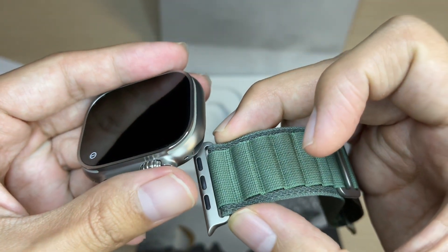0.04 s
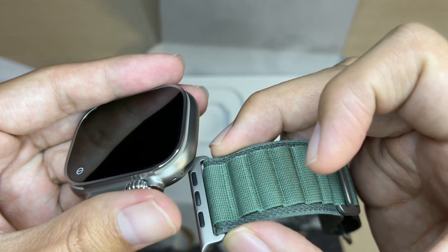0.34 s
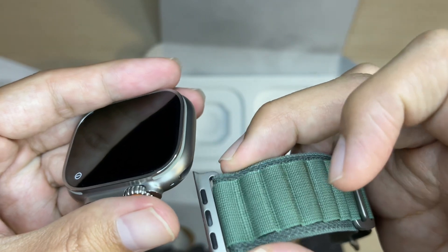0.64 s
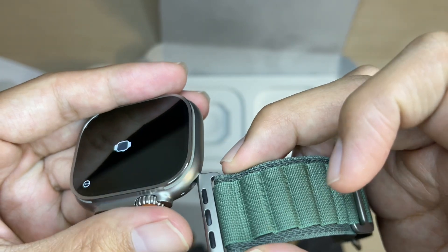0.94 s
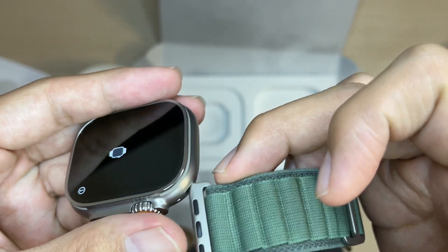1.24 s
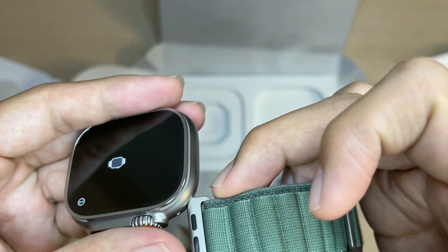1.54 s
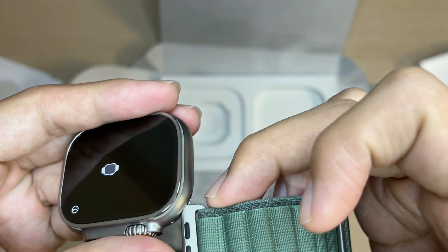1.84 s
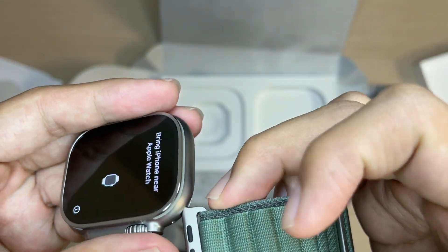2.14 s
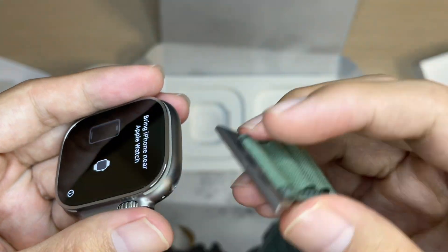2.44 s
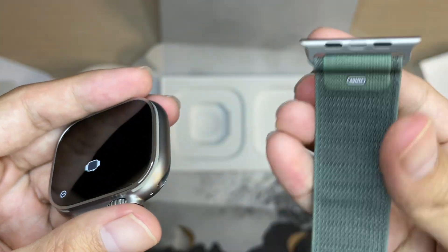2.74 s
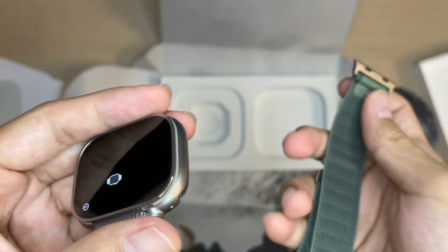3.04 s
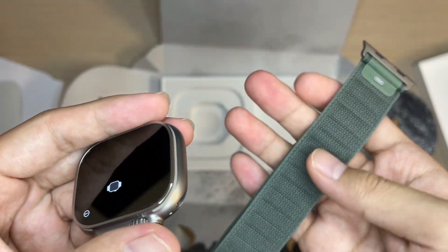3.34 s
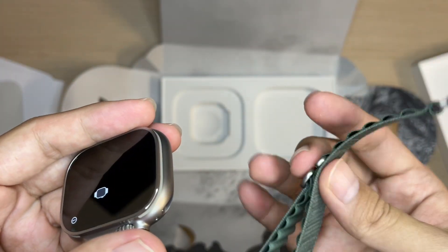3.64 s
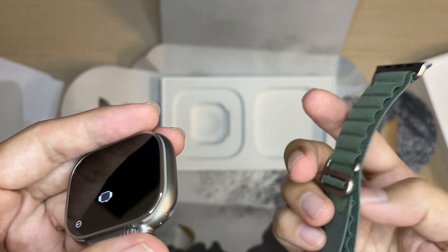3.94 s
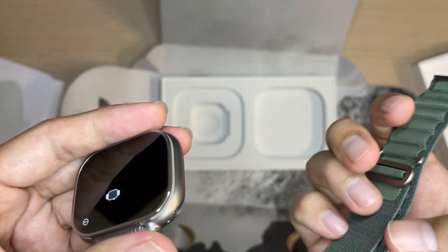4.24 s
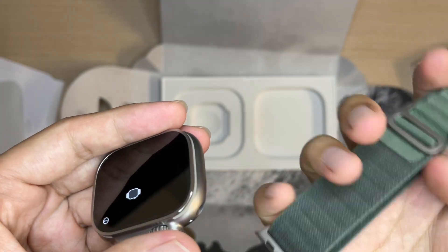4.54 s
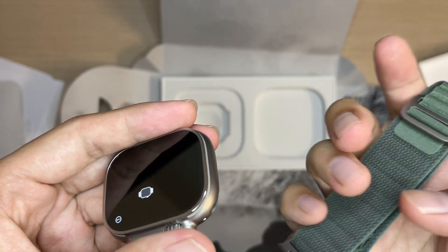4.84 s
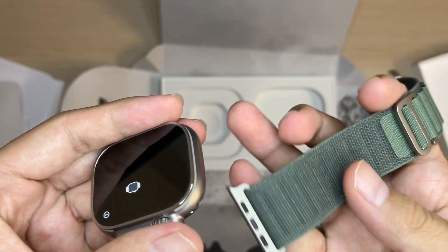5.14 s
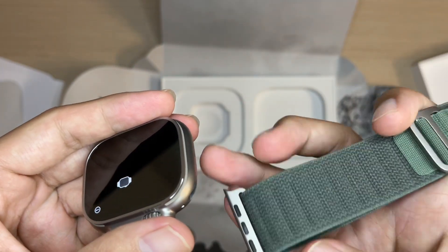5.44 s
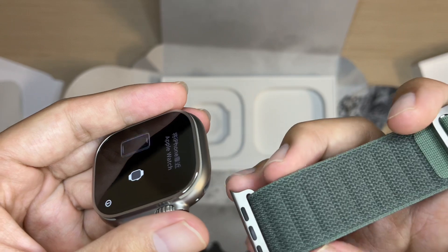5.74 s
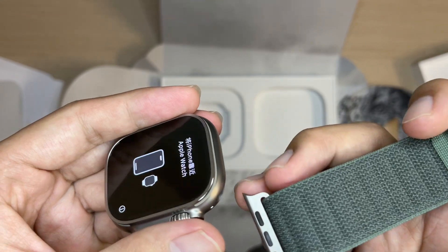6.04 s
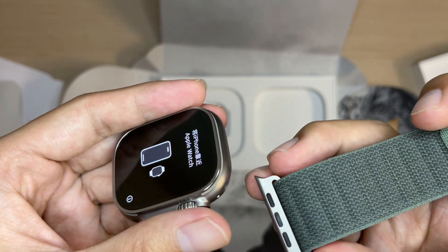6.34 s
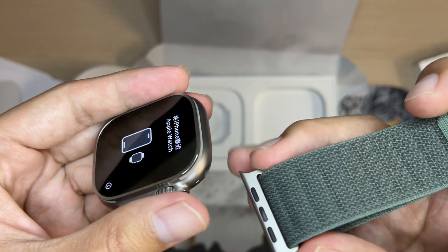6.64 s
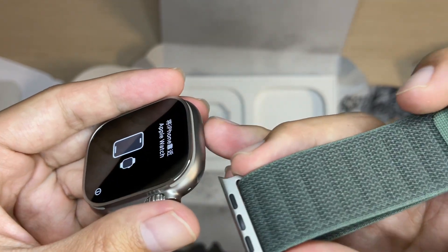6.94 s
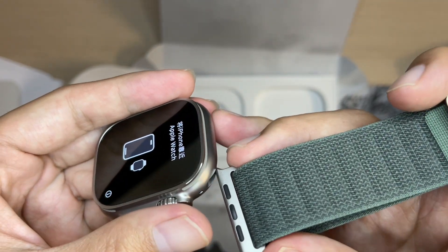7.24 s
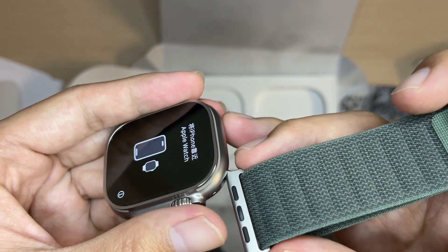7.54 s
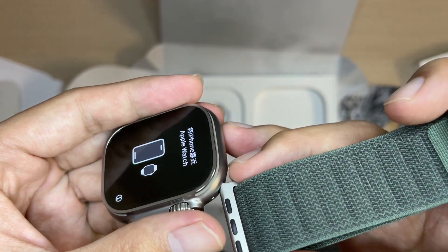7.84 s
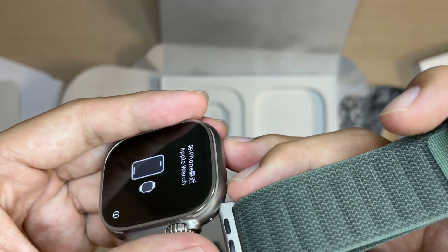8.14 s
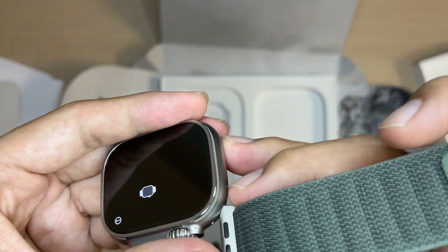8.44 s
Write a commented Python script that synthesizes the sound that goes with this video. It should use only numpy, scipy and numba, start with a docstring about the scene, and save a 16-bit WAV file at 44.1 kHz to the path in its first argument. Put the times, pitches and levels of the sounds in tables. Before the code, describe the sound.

A metal watch and its woven band are handled close to the microphone in a small room. First come a few light ticks and brief, squeaky scrapes from the band's metal end. Then fingers slide over the weave in a run of scratchy, hissing strokes, mixed with buckle clicks. After a lull, a few more ticks and a sharp little scrape follow. Ventilation rumbles and hums steadily throughout.

```python
"""A metal watch on a woven band, turned over in the hands close to a phone's microphone in a small room.
Fingers slide over the weave and its threads catch and hiss; the band's metal end scrapes in stick-slip
and ticks, the buckle clicks. Table top and near walls add a short tail.
Ventilation rumbles and hums steadily behind; two microphone ports hear it all a little apart."""
import sys
import numpy as np
from scipy import signal
from scipy.fft import rfft, irfft
from scipy.io import wavfile
from numba import njit

SR = 44100
rng = np.random.default_rng(int(sys.argv[2]) if len(sys.argv) > 2 else 0)


def to_wav(sig):
    """Store sig (one row per channel, or 1-D mono) as 16-bit WAV at the path in sys.argv[1].

    Samples outside -1..1 are clipped; the rate is SR.
    """
    pcm = np.clip(np.atleast_2d(sig), -1, 1) * 32767
    pcm = np.round(pcm).astype(np.int16)
    wavfile.write(sys.argv[1], SR, pcm.T)  # frames by channels


N = 378378
T = np.arange(N) / SR
FREQS = np.maximum(np.fft.rfftfreq(N, 1 / SR), 1)
# spectrum of skin on the weave, close up [f/Hz, level/dB]
WEAVE_SPECTRUM = [(2500, -24.5), (4000, -6.5), (5000, -7), (5800, -1.5), (7000, -1.5), (8500, 2),
                  (9600, -2), (10300, 6), (11100, 2.5), (11600, -7.5), (12300, -22), (13000, -45)]


def webbing(grip_s=0.024, release_s=0.041, ahead_db=-14, ahead_hz=4700):
    """Threads catch on skin and hiss over a duller rub. Gives sound at the hands and from straight ahead."""
    # the band slides through the fingers [start/s, length/s, relative level/dB, rub share/dB]
    slides = [(0, 0.31, -83.5, 3.5), (0.293, 0.25, -85, 5), (2.308, .2, -88.5, 10.5),
              (2.496, .3, -82.5, 7.5), (4.6, .07, -77, 1), (2.869, 0.098, -61, -3.5),
              (2.983, 1.2, -72.5, -2.5), (3.453, .17, -75.5, -1), (3.705, 0.077, -58.5, -18),
              (4.254, 0.362, -59.5, -7.5), (4.662, 0.38, -60, -8.5), (5.032, 0.29, -61, -9.5),
              (5.319, 0.15, -69, -14), (7.895, 0.083, -70.5, -8), (7.1, 1.27, -92.5, 8.5)]
    # a fingertip brushes the weave once [crest/s, length/s, level/dB, rub share/dB]
    brushes = [(0.022, 0.11, -73, -8), (2.516, 0.066, -72, 1), (2.624, 0.089, -61, -5),
               (2.738, 0.037, -59, 3.5), (2.837, 0.11, -57, -2.5), (3.053, 0.054, -70, -10),
               (3.306, 0.13, -60.5, -8), (3.457, 0.069, -70, -6), (3.619, 0.076, -56.5, -7),
               (3.685, 0.018, -54.5, -10), (3.958, 0.1, -63.5, -12), (4.504, 0.11, -60, -9),
               (4.567, 0.098, -55.5, -3.5), (4.886, 0.26, -75, -2.5), (4.685, 0.027, -57, -8.5),
               (5.01, 0.048, -50.5, -8), (5.049, .02, -54, -8), (5.276, 0.099, -57, -21),
               (5.379, 0.08, -61, -9), (5.585, 0.15, -79, 4), (5.799, 0.091, -74.5, 4.5),
               (6.491, 0.042, -81.5, 7), (7.644, 0.051, -79.5, 11.5), (8.408, 0.083, -61, -6),
               (8.528, 0.027, -65, 4)]
    # spectrum of the pressed band's rub [f/Hz, level/dB]
    rub_spectrum = [(400, -15), (900, 1.5), (1700, -3.5), (2500, 2), (3800, -1), (5000, 1.5), (8000, -28)]
    pace = undb(-1 + 0.1 * walk(rate=18))  # the hand never pulls evenly
    moves = [(undb(db) * pace * drag(start, length + release_s / 2, grip_s, release_s), rub_db)
             for start, length, db, rub_db in slides]
    moves += [(undb(db) * touch(crest, length), rub_db) for crest, length, db, rub_db in brushes]
    hiss_speed = np.sqrt(sum(speed ** 2 for speed, _ in moves))
    rub_speed = np.sqrt(sum((speed * undb(rub_db)) ** 2 for speed, rub_db in moves))
    threads = catches(rate=6000, scatter_db=1.5) + undb(-5.5) * catches(rate=380, scatter_db=0)
    hiss = hiss_speed * unit(unit(colour(threads, WEAVE_SPECTRUM)) + undb(-5) * plucks())
    rub = rub_speed * unit(colour(catches(rate=4000, scatter_db=2), rub_spectrum))
    narrow_hiss = glide(catches(rate=2600, scatter_db=2.5), ahead_hz, width_hz=2600)
    ahead = undb(ahead_db) * hiss_speed * unit(narrow_hiss)
    scratch = shifting_contact(hiss + rub)
    return np.array([scratch, ahead]) * undb(1.5 * walk(rate=90))  # the ribs grip unevenly


def plucks(width_hz=330, count=14, snags_per_s=13):
    """Single threads snag and spring free, each ringing for a few milliseconds at its own pitch."""
    pitches_hz = np.linspace(3000, 11400, count)
    snags = rng.random((count, N)) < snags_per_s / SR
    rings = sum(resonate(1. * snag, hz, width_hz) for snag, hz in zip(snags, pitches_hz))
    return unit(colour(rings, WEAVE_SPECTRUM))


def shifting_contact(x, depth_db=2.6, count=7):
    """As the contact patch moves, each part of the treble swells and fades by itself."""
    spectrum, centres_hz = rfft(x), np.linspace(2000, 12000, count)
    bands = (irfft(spectrum * np.interp(FREQS, centres_hz, share), N) for share in np.eye(count))
    return sum(band * undb(depth_db * walk(rate=35)) for band in bands)


def swishes(width_hz=750, octaves_per_s=-0.91):
    """A quick skid sings high in the weave and sinks as the finger slows."""
    # skin skids over the ribs [crest/s, length/s, level/dB, f/Hz]
    skids = [(2.834, .06, -62, 11000), (3.31, .07, -67, 11000), (3.622, 0.035, -60, 11000),
             (3.738, 0.1, -64, 11000), (4.308, 0.11, -60, 10960), (4.512, 0.11, -50.5, 10900),
             (5.076, 0.091, -64, 11500), (5.254, .07, -75, 10900), (7.779, 0.034, -59.5, 10500),
             (8.412, 0.055, -65, 10400)]
    slips = catches(rate=5900, scatter_db=1)
    out = np.zeros(N)
    for crest, length, db, hz in skids:
        swish = glide(slips, hz, width_hz, crest, length, octaves_per_s * length)
        out += undb(db) * touch(crest, length) * unit(swish)
    return out


def grazes():
    """Light friction wakes one damped resonance at a time; some glide as the contact moves."""
    # a finger grazes buckle, lug or taut band [crest/s, length/s, level/dB, f/Hz, width/Hz, glide/octaves]
    contacts = [(1.262, .022, -51.5, 1010, 600, 0.084), (1.282, 0.033, -51, 3000, 1000, -.55),
                (2.22, 0.045, -44, 1540, 750, -.75), (2.517, .038, -71, 2590, 760, 0),
                (2.625, 0.079, -67, 2400, 760, 0), (2.86, 0.084, -61.5, 2850, 760, 0),
                (3.265, 0.98, -71.5, 1350, 900, 0), (3.26, .26, -61.5, 610, 700, 0),
                (3.947, 0.078, -68, 2800, 760, 0), (4.076, .037, -68.5, 2880, 760, 0),
                (4.485, 0.046, -66, 3400, 1200, 0), (4.61, 0.015, -63, 3400, 500, 0),
                (4.748, .026, -60.5, 3400, 900, -0.36), (4.861, .018, -63, 3800, 450, 0),
                (5.01, .016, -54, 3500, 1500, 0), (5.164, .027, -64.5, 3800, 500, 0),
                (5.26, 0.22, -66.5, 3940, 760, 0), (5.25, .3, -75, 860, 500, 0),
                (7.777, .024, -58.5, 3840, 700, 0), (7.917, 0.022, -64.5, 3100, 1100, 0),
                (8.551, 0.03, -49, 2100, 700, 0.22), (8.558, 0.065, -55, 2800, 760, 0)]
    slips = catches(rate=7000, scatter_db=-1)
    out = np.zeros(N)
    for crest, length, db, hz, width, octaves in contacts:
        speed = touch(crest, length)
        ring = glide(speed * slips, hz, width, crest, length, octaves)
        out += undb(db) * ring * np.linalg.norm(speed) / np.linalg.norm(ring)
    return out


def scrapes(squeak_q=11, judder_db=1.5, light_touch_db=-5):
    """The metal end sticks and slips: grit and squeak grow with pressure, a firm press rings its body."""
    # strokes of the metal end [start/s, length/s, hardest press/share of length, grit/dB, ring/dB,
    # squeak f/Hz, squeak relative level/dB, glide/octaves, overtone/dB]
    strokes = [(0.816, 0.031, 0.03, -60, -54, 3400, -57.5, -0.36, -7),
               (0.88, 0.071, 0.46, -84, -60.5, 3200, -65.5, -0.031, -21),
               (1.241, 0.054, 0.5, -63, -49.5, 6130, -54, -.3, -8),
               (2.161, 0.0765, 0.92, -48, -49.5, 5360, -48, -0.036, 13),
               (7.233, 0.043, 0.16, -78, -68, 2830, -61, 0.034, -10),
               (7.754, 0.047, 0.4, -54.5, -66, 5430, -61, 0.036, -4),
               (7.905, 0.017, 0.6, -61, -68, 3200, -70, 0, -14),
               (8.533, 0.029, 0.65, -46, -54.5, 6550, -50.5, 0.21, -14),
               (8.56, .012, 0.46, -50, -55, 6300, -53, 0, -14)]
    # spectrum of the grit [f/Hz, level/dB]
    grit_spectrum = [(1200, -8.5), (2500, -1.5), (4500, 1.5), (6200, 0.5), (7000, -13), (7900, 2),
                     (9700, -13), (10600, 0), (11400, 4), (12000, -20), (13000, -35)]
    slips = rasp() * catches(rate=11000, scatter_db=-0.5) * undb(judder_db * walk(rate=770))
    grit, ring = colour(slips, grit_spectrum), metal_body(slips)
    out = np.zeros(N)
    for start, length, hardest, grit_db, ring_db, hz, squeak_db, octaves, overtone_db in strokes:
        press = stroke(start, length, hardest)
        bite = drag(start, length, attack_s=0.0094, release_s=0.0016)
        friction = bite * undb(light_touch_db * (1.5 - press))
        width, middle = 2 * hz / squeak_q, start + length / 2
        squeak = glide(slips, hz, width, middle, length, octaves)
        squeak += undb(overtone_db) * glide(slips, 2 * hz, width, middle, length, octaves)
        layers = (grit, friction, grit_db), (ring, press ** 0.76, ring_db), (squeak, friction, squeak_db - 1)
        for sound, drive, db in layers:
            out += undb(db) * drive * sound * np.linalg.norm(drive) / np.linalg.norm(drive * sound)
    return out


def rasp(slip_hz=169.5, jitter=0.18, fade_cycles=0.47):
    """Uneven stick-slip cycle of the metal edge: each release starts sharply and fades to a floor."""
    phase = np.cumsum(slip_hz * (1 + jitter * walk(rate=110))) / SR % 1
    return unit(undb(2) + np.exp(-phase / fade_cycles))


def ticks(contact_s=0.00035, chatter_db=-15, chatter_s=0.0045, width_hz=2100, push_s=0.000089, size=2048):
    """A very short metal contact snaps brightly, chatters briefly and knocks the body."""
    # metal end and buckle strike [t/s, snap before colouring/dB, ring/dB, snap f/Hz, broad crack share/dB]
    strikes = [(.174, -42, -48.5, 10700, -10.5), (.2575, -54.5, -57.5, 10800, -12),
               (0.8186, -37, -47, 10900, -21.5), (0.942, -49, -58, 7900, 12), (.9522, -53, -68, 7940, -5),
               (1.2414, -70, -52, 6500, -12), (1.2527, -60, -42.5, 7000, -10),
               (1.2615, -53, -48, 6200, -18), (1.2697, -49, -60, 6050, -20), (1.2935, -40, -48, 12100, -5),
               (2.1604, -54, -54, 10700, -15), (2.6083, -55, -74, 11300, -20),
               (2.7365, -66, -66, 10500, -6), (2.805, -58, -66, 8500, -5), (3.294, -49, -74, 10800, -4),
               (3.536, -51, -78, 9500, -5), (3.683, -45, -69, 11900, -33), (4.3065, -50, -76, 12000, -21),
               (4.333, -55.5, -66, 6500, -5), (4.434, -59, -74, 7000, -10), (4.568, -55, -66, 6500, -6),
               (4.576, -50, -68, 6300, -6), (4.591, -53, -64, 4200, -6), (4.6755, -46.5, -61, 10500, -20),
               (4.718, -47, -77, 10600, -20), (5.0176, -36, -68, 8050, -13), (5.034, -68, -80, 6600, -20),
               (5.0495, -34, -74, 8670, -26), (5.274, -47.5, -75, 8460, 3), (5.4327, -55, -84, 9900, -18),
               (5.605, -62, -63, 7000, -5), (6.6659, -61.5, -82, 6800, -13), (6.796, -69.5, -84, 6960, -16),
               (7.49, -59.5, -62, 6270, -6), (7.53, -57, -61, 4340, 3)]
    # colouring of the snaps [f/Hz, gain/dB]
    snap_spectrum = [(1000, -22), (3000, -2.5), (5000, 7.5), (8000, -0.5), (11000, -0.5), (12200, -21),
                     (14000, -28)]
    t = np.arange(size) / SR
    snaps, knocks = np.zeros((2, N + size))
    span = np.sqrt(0.002 * SR)  # levels count as energy spread over 2 ms
    knock = metal_body(t * np.exp(-t / push_s))  # the fingers cushion the push
    force = np.exp(-t / contact_s) + undb(chatter_db) * np.exp(-t / chatter_s)
    for start, snap_db, ring_db, hz, crack_db in strikes:
        contact = rng.standard_normal(size) * force
        snap = resonate(resonate(contact, hz, width_hz), hz, width_hz) + undb(crack_db) * contact
        i = int(start * SR)
        snaps[i:i + size] += undb(snap_db) * span * snap / np.linalg.norm(snap)
        knocks[i:i + size] += undb(ring_db) * span * knock / np.linalg.norm(knock)
    return colour(snaps[:N], snap_spectrum) + knocks[:N]


def metal_body(x):
    """The metal end rings briefly, damped by the fingers."""
    # its resonances [f/Hz, width/Hz, level/dB]
    modes = [(952, 56, 3), (1260, 150, -9), (1620, 195, 11), (2220, 290, 6), (3050, 120, -22),
             (3660, 250, -10)]
    return sum(undb(db) * resonate(x, hz, width) for hz, width, db in modes)


def room(x, wet_db=-15, t60_s=0.26, gap_s=0.002, apart=0.07, size=16384):
    """Table top and near walls give a short diffuse tail, slightly different at each port."""
    t = np.arange(size) / SR
    mid, side = rng.standard_normal((2, size)) * undb(-60 * t / t60_s) * (t > gap_s)
    tail = np.array([mid + apart * side, mid - apart * side])
    tail /= np.linalg.norm(tail, axis=1, keepdims=True)
    return undb(wet_db) * signal.fftconvolve(x[None], tail, axes=1)[:, :N]


def ports(x):
    """Sound from the hands reaches the two microphone ports out of step."""
    # lead of the left port [f/Hz, phase/rad]
    left_lead = [(100, 4), (1500, -1.2), (2840, 1.17), (4050, 1), (4820, 3.2), (5500, 5.6), (7580, 8.15),
                 (8950, 9.4), (11000, 11.2), (12400, 12.3)]
    turn = np.exp(0.5j * on_freqs(left_lead))
    return irfft(rfft(x) * np.array([turn, 1 / turn]), N)


def ventilation():
    """Moving air and wavering motor tones behind the hands; the lows are alike at both ports."""
    # motor tones [f/Hz, level/dB, waver/dB]
    tones = [(61.4, -56, 4.5), (98.9, -57.5, 4), (119.2, -54, 3.5), (230.4, -67, 6), (335.4, -71.5, 4),
             (409.3, -70.5, 4.5), (486.6, -74.5, 3), (1046, -81, 2), (1530, -88.5, 1), (1583, -91.5, 4.5),
             (1750, -93, 5), (2255, -90.5, 2)]
    # swells of the lowest tone [crest/s, length/s, level/dB]
    hum_swells = [(.85, 0.49, -52), (1.3, 0.55, -50), (1.88, 0.3, -48), (4.123, 0.32, -46),
                  (5.75, 0.29, -47.5), (6.948, 0.47, -49.5), (7.402, 0.3, -50), (8.168, 0.37, -46.5)]
    # stereo width of the room's air [f/Hz, side relative to mid/dB]
    air_width = [(30, -36), (65, -33.5), (130, -30), (200, -27.5), (300, -11), (500, -4.5), (800, 0),
                 (1300, -4.5), (2500, -6), (5000, -0.5), (12000, 1.5)]
    mid = duct_air()
    for hz, db, waver_db in tones:
        waver = undb(waver_db * walk(rate=7))
        phase = 2 * np.pi * hz * T + 0.3 * waver_db * walk(rate=5)
        mid += undb(db) * unit(waver * np.sin(phase))
    swells = sum(undb(db) * touch(crest, length) for crest, length, db in hum_swells)
    mid += swells * unit(np.sin(2 * np.pi * tones[0][0] * T + walk(rate=9)))
    # low mids come from the left
    lean = undb(4) * on_freqs([(100, 0.008), (170, 0.031), (280, 0.098), (500, 0.14), (900, 0.0054)])
    side = irfft(rfft(duct_air()) * undb(on_freqs(air_width)) + rfft(mid) * lean, N)
    return rumble_drift(np.array([mid + side, mid - side]))


def duct_air(rumble_db=-47, hiss_db=-66.5):
    """Air in the duct: a low rumble under a faint hiss."""
    # spectra of rumble and hiss [f/Hz, level/dB]
    rumble_spectrum = [(20, -26.5), (33, -9), (50, -13.5), (62, 3), (72, -2.5), (84, -5.5), (100, -3.5),
                       (135, -2.5), (185, -4.5), (213, -12.5), (280, -12.5), (370, -19.5), (455, -21.5),
                       (700, -34)]
    hiss_spectrum = [(500, 3), (800, 1.5), (1200, -5), (1700, -7.5), (2500, -15.5), (3600, -21.5),
                     (4900, -27.5), (6000, -26.5), (8000, -27), (9100, -59.5), (10000, -26.5), (11000, -26),
                     (12800, -40.5)]
    rumble = unit(colour(rng.standard_normal(N), rumble_spectrum))
    hiss = unit(colour(rng.standard_normal(N), hiss_spectrum))
    return undb(rumble_db) * rumble + undb(hiss_db) * hiss


def rumble_drift(x, wander_db=0.36, split_hz=260):
    """The lows rise and sink slowly under the steady hiss."""
    # course of the lows [t/s, gain/dB]
    course = [(0, 1), (1.3, 0.8), (2.2, -1.9), (3.3, -0.2), (4.7, -0.3), (6.2, 0), (6.8, 1.8), (8.5, 0.5)]
    low = irfft(rfft(x) / (1 + (FREQS / split_hz) ** 8), N)
    gain = undb(np.interp(T, *np.transpose(course)) + wander_db * walk(rate=4.2))
    return x + (gain - 1) * low


def catches(rate, scatter_db):
    """Tiny slips at random moments, rate a second; scatter_db spreads their sizes."""
    happens = rng.random(N) < rate / SR
    slips = happens * rng.standard_normal(N)
    return unit(slips * undb(scatter_db * np.minimum(rng.exponential(size=N), 4)))


def stroke(start, length, rise_share):
    """One short movement: it swells to a crest and dies away."""
    first, last = np.searchsorted(T, [start, start + length])
    speed = np.zeros(N)
    moments = start + length * np.array([0, np.clip(rise_share, 0, 1), 1])
    from_crest = np.interp(T[first:last], moments, [1, 0, 1])
    speed[first:last] = (1 - from_crest ** 2) ** 2
    return speed


def touch(crest, length, rise_share=0.49):
    """A nearly symmetric stroke, timed by its crest."""
    return stroke(crest - rise_share * length, length, rise_share)


def drag(start, length, attack_s, release_s):
    """Speed of a sustained movement: attack, hold, release."""
    return np.clip(np.minimum((T - start) / attack_s, (start + length - T) / release_s), 0, 1)


def walk(rate):
    """Random wander with rms 1 and rate turning points a second."""
    knots = np.arange(0, N / SR + 1, 1 / rate)
    values = np.random.default_rng(rng.integers(1 << 30)).standard_normal(len(knots))
    return unit(np.interp(T, knots, values))


def resonate(x, hz, width_hz):
    """One resonance, gain 1 at its centre."""
    return signal.lfilter(*signal.iirpeak(min(hz, SR / 2 - 1), hz / width_hz, fs=SR), x)


def glide(x, hz, width_hz, middle=0, length=1, octaves=0):
    """Two resonances in series slide through hz in the middle of a movement; still by default."""
    progress = np.clip((T - middle) / length, -0.5, 0.5)
    centre = np.minimum(hz * 2 ** (octaves * progress), 0.45 * SR)
    return sweep(sweep(x, centre, float(width_hz)), centre, float(width_hz))


@njit
def sweep(x, hz, width_hz):
    """State-variable resonance whose centre moves, gain 1 at the centre."""
    y, band_state, low_state = np.zeros(len(x)), 0., 0.
    for i in range(len(x)):
        if x[i] == 0 and abs(band_state) + abs(low_state) < 1e-12:
            continue
        g = np.tan(np.pi * hz[i] / SR)
        damping = np.pi * width_hz / SR * (1 + g * g) / g
        band = (band_state + g * (x[i] - low_state)) / (1 + g * (g + damping))
        band_state = 2 * band - band_state
        low_state += 2 * g * band
        y[i] = damping * band
    return y


def colour(x, points):
    """Minimum-phase filter through (Hz, dB) points, falling 20 dB an octave past both ends."""
    octaves_below = np.maximum(np.log2(points[0][0] / FREQS), 0)
    octaves_above = np.maximum(np.log2(FREQS / points[-1][0]), 0)
    gain = undb(on_freqs(points) - 20 * (octaves_below + octaves_above))
    cepstrum = irfft(np.log(gain), N)
    cepstrum[1:N // 2] *= 2
    cepstrum[N // 2 + 1:] = 0
    return irfft(rfft(x) * np.exp(rfft(cepstrum)), N)


def on_freqs(points):
    """Join (Hz, value) points on a log-frequency axis."""
    hz, value = np.transpose(points)
    return np.interp(np.log(FREQS), np.log(hz), value)


def undb(db):
    """Decibels to gain."""
    return 10 ** (np.asarray(db) / 20)


def unit(x):
    """Scale to rms 1."""
    return x / np.sqrt(np.mean(x ** 2))


def scene():
    """Hands close up, ventilation behind; a little band and metal sounds straight ahead of both ports."""
    weave, weave_ahead = webbing()
    metal = scrapes() + ticks()
    hands = weave + swishes() + grazes() + metal
    ahead = weave_ahead + undb(-10) * resonate(metal, hz=4750, width_hz=900)
    return ports(hands + room(hands)) + ahead + ventilation()


def record(dry, top_hz=13652):
    """The phone cuts the top steeply."""
    return signal.sosfilt(signal.ellip(8, 0.2, 70, top_hz, fs=SR, output="sos"), dry)


dry = scene()
out = record(dry)
to_wav(out)
```